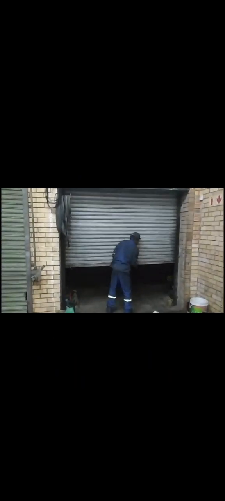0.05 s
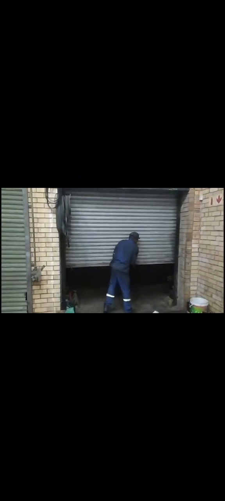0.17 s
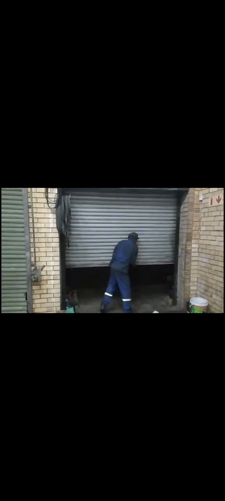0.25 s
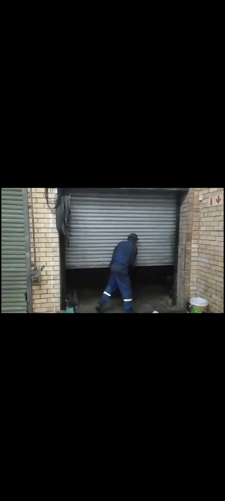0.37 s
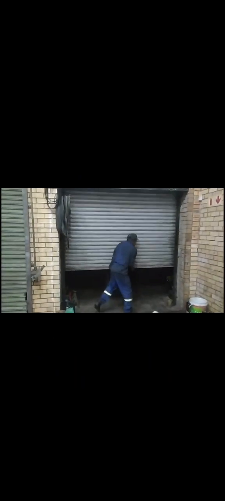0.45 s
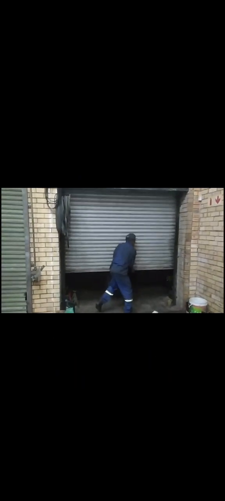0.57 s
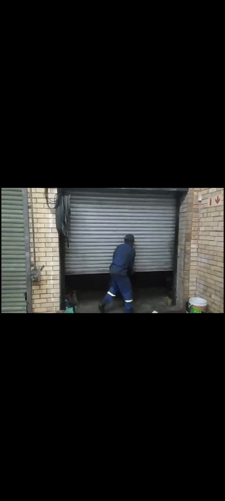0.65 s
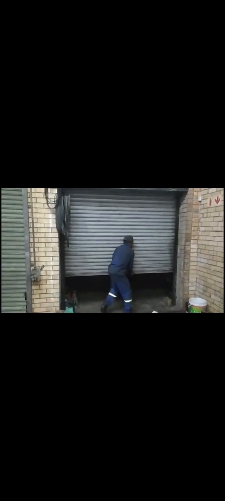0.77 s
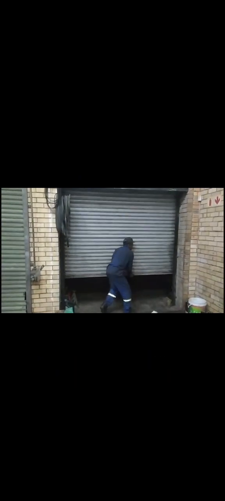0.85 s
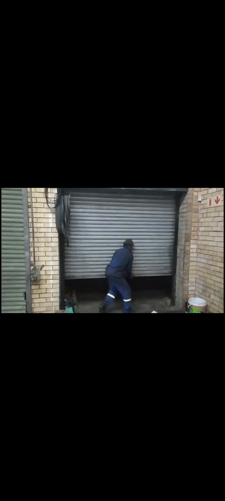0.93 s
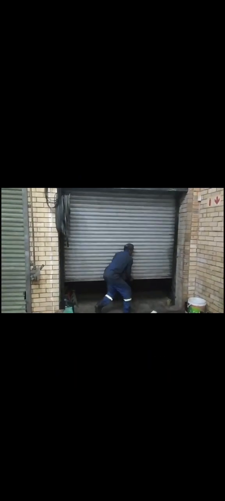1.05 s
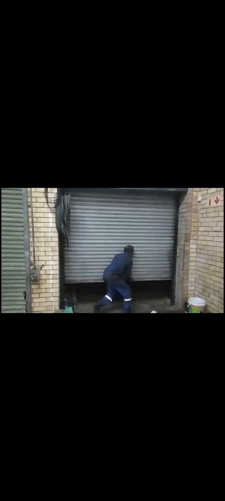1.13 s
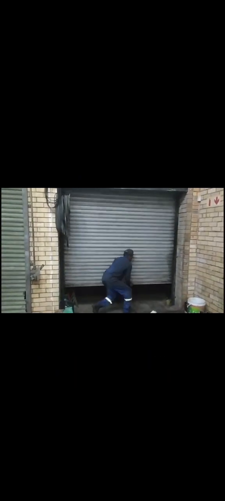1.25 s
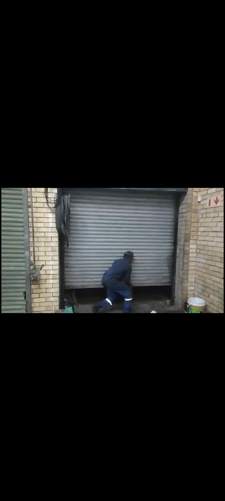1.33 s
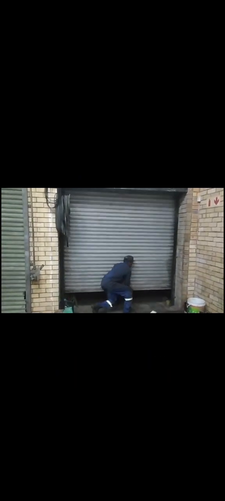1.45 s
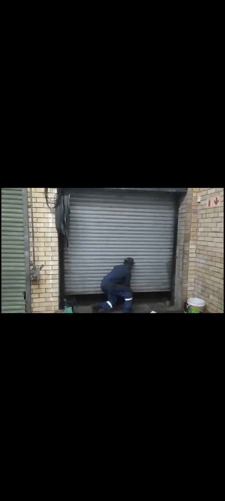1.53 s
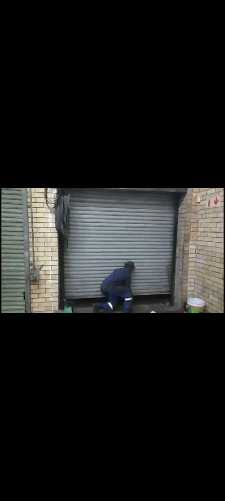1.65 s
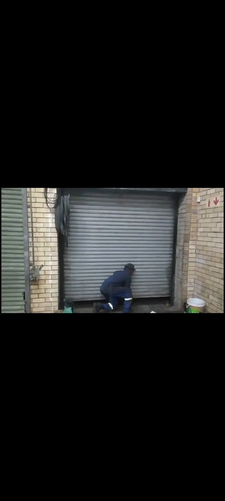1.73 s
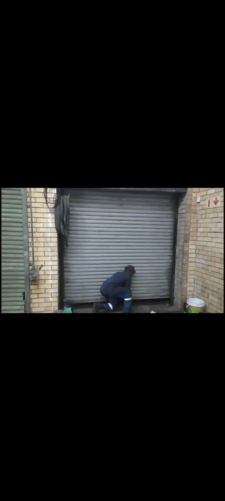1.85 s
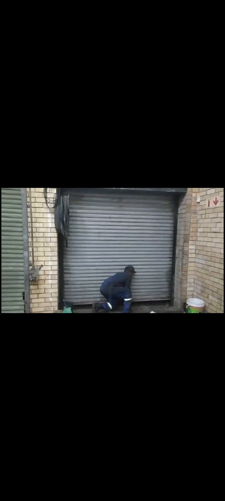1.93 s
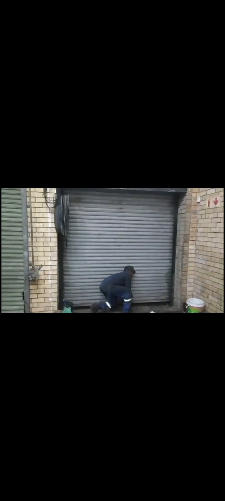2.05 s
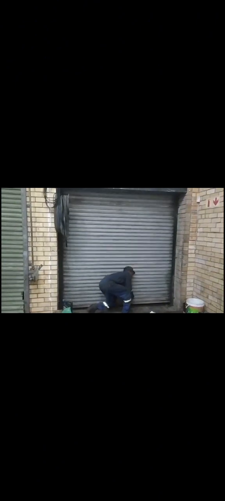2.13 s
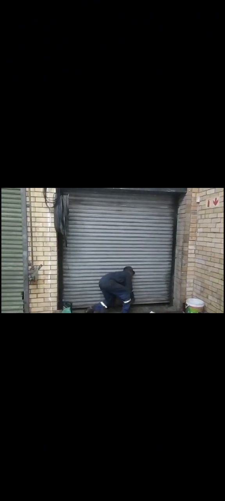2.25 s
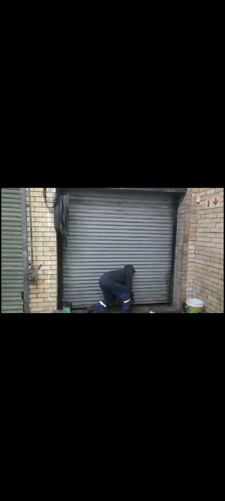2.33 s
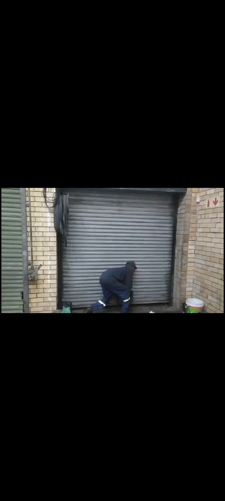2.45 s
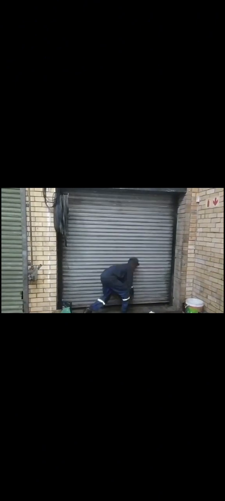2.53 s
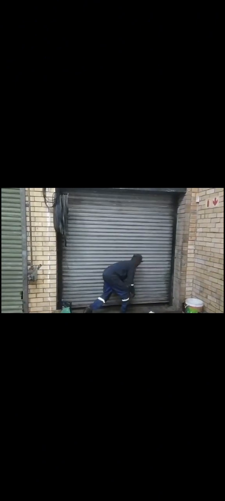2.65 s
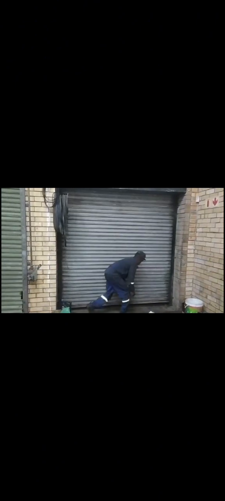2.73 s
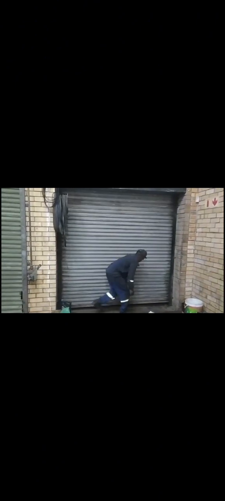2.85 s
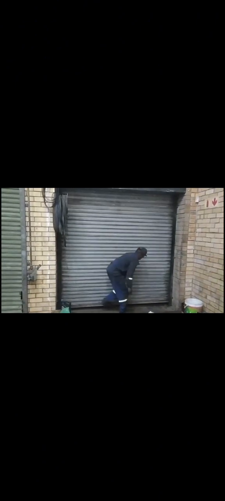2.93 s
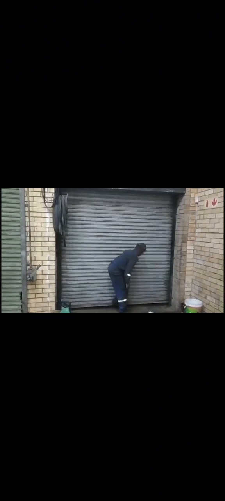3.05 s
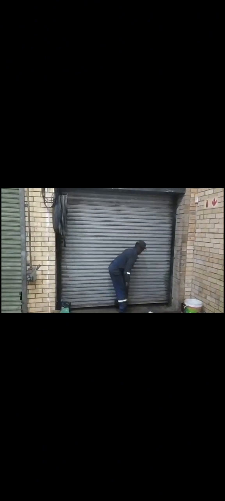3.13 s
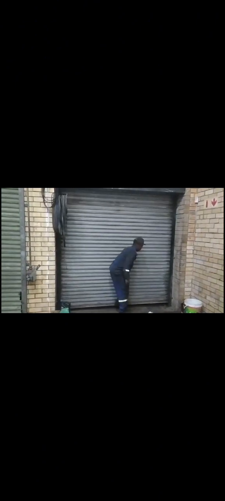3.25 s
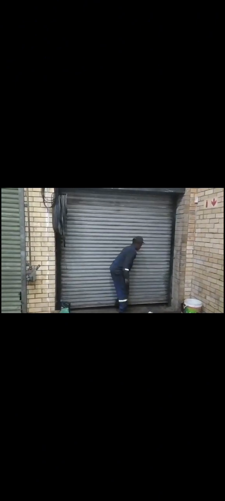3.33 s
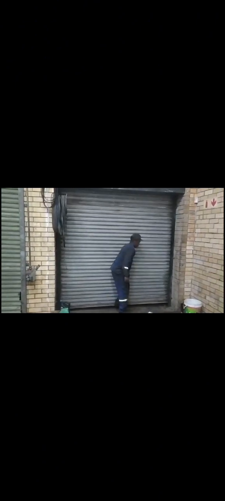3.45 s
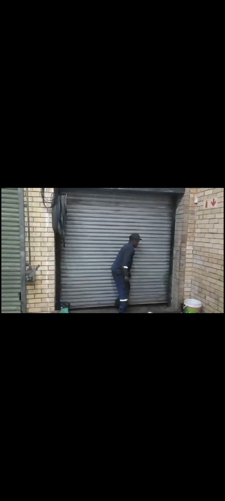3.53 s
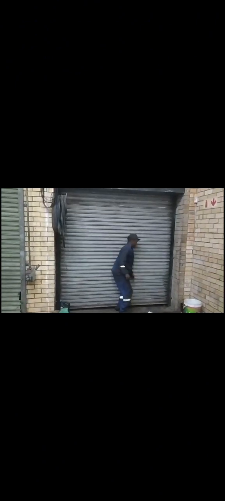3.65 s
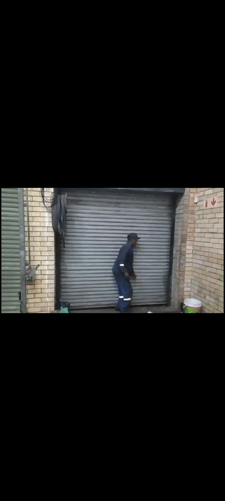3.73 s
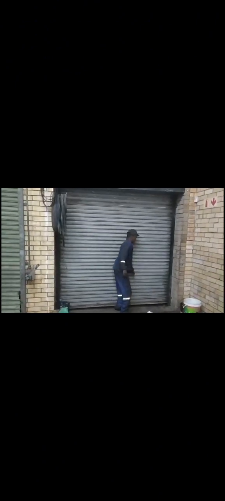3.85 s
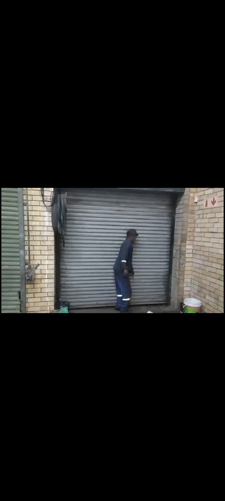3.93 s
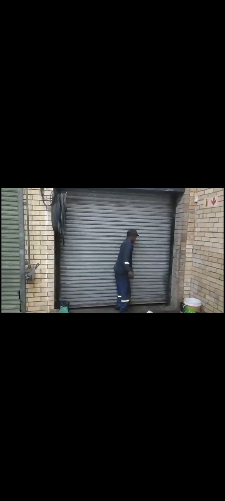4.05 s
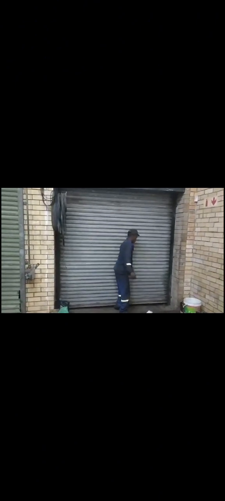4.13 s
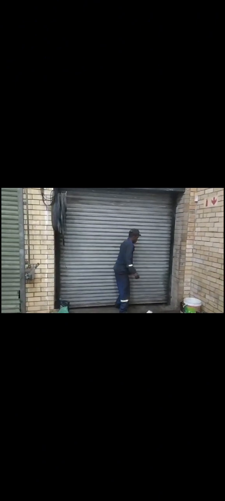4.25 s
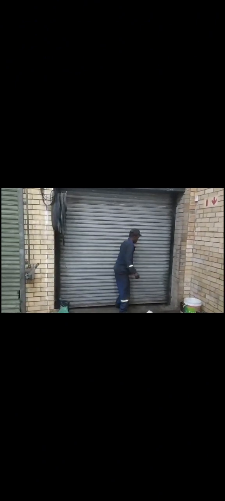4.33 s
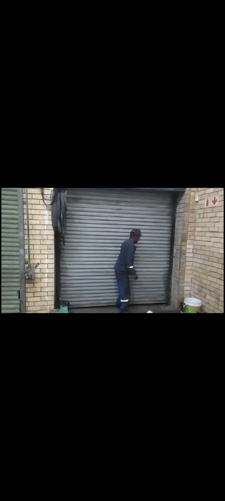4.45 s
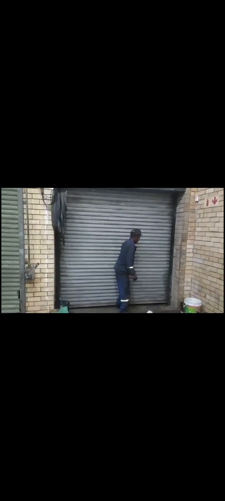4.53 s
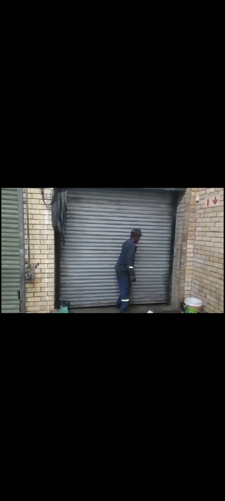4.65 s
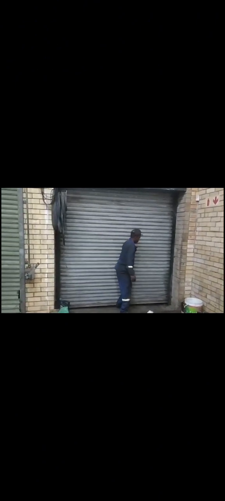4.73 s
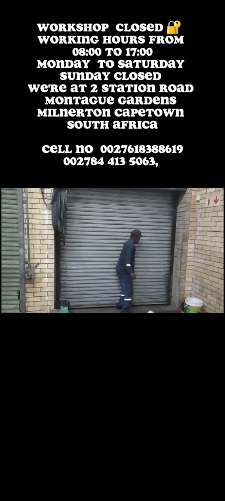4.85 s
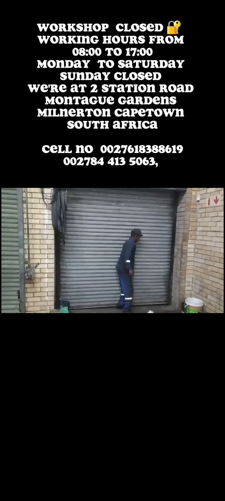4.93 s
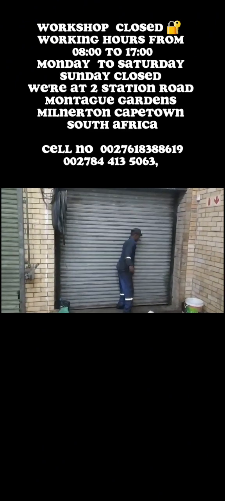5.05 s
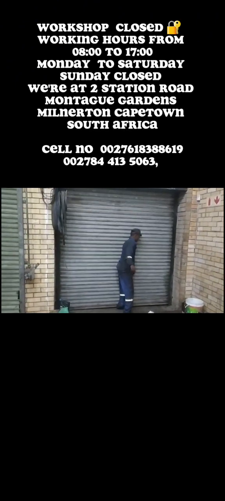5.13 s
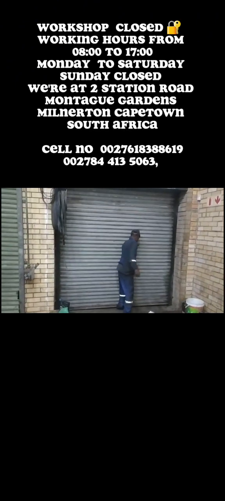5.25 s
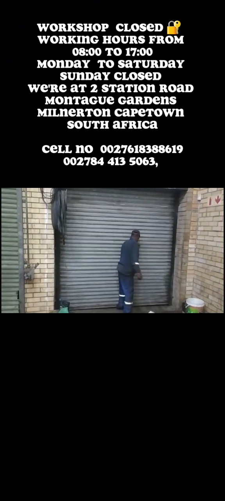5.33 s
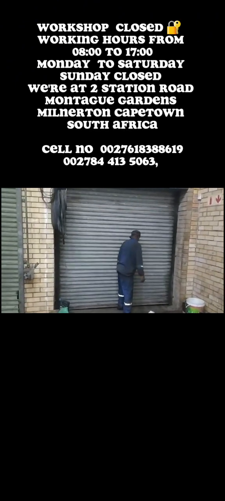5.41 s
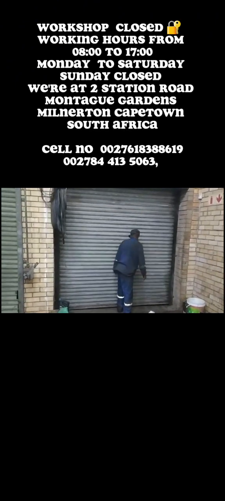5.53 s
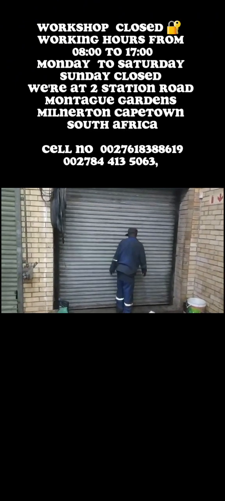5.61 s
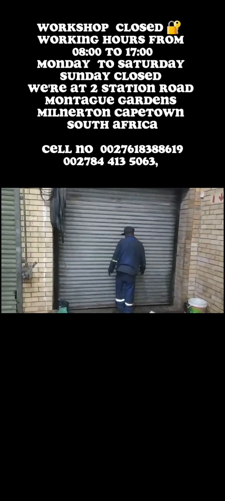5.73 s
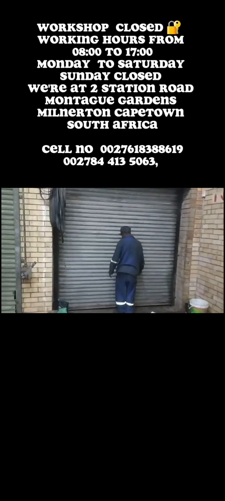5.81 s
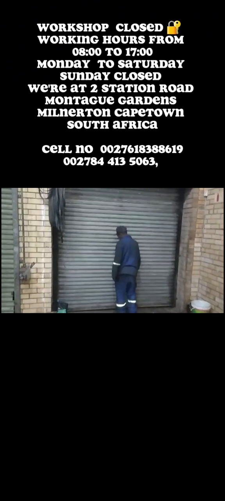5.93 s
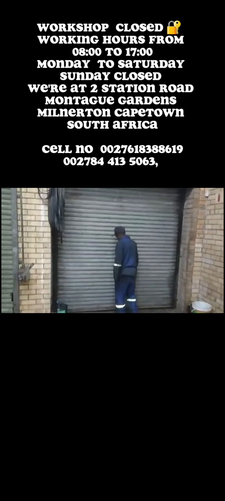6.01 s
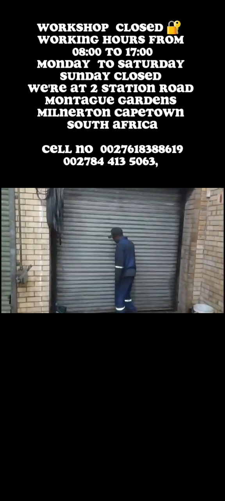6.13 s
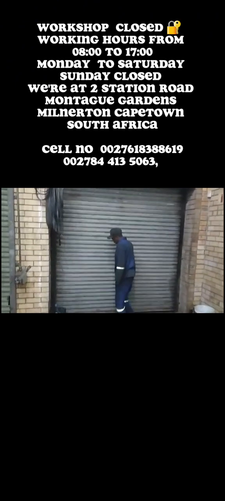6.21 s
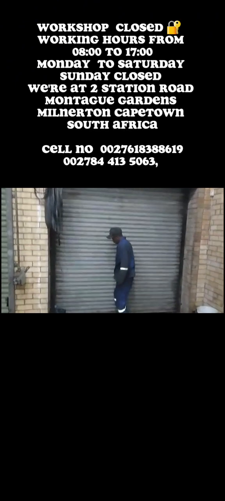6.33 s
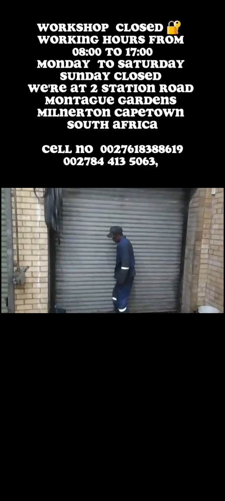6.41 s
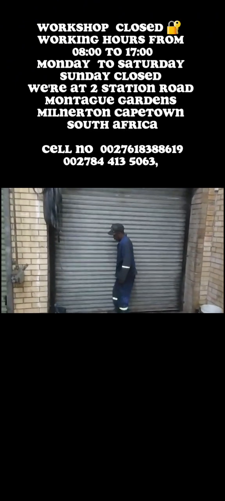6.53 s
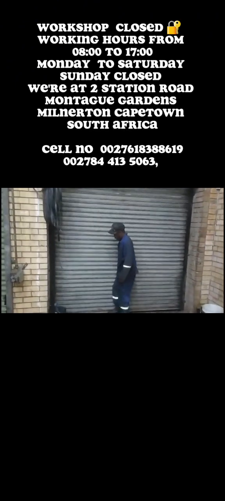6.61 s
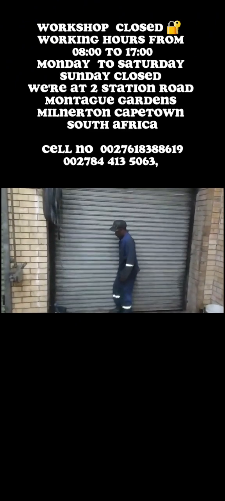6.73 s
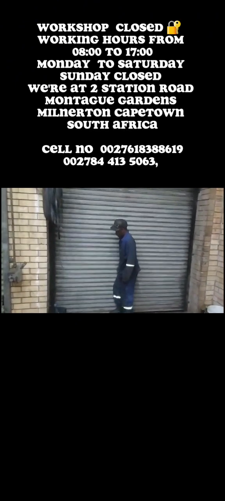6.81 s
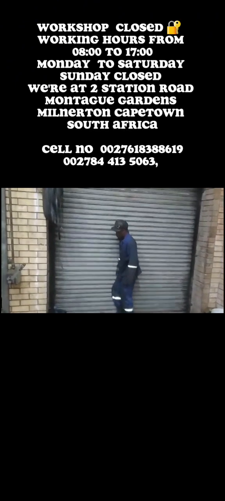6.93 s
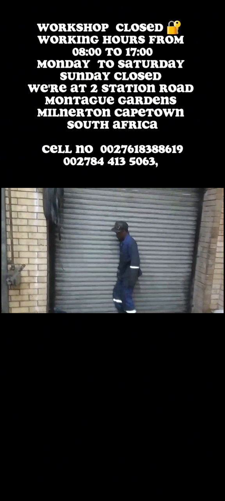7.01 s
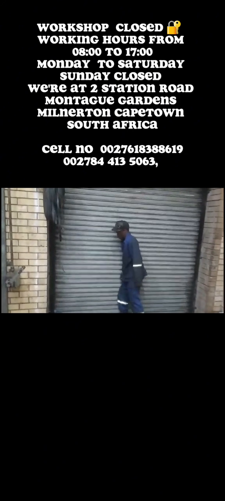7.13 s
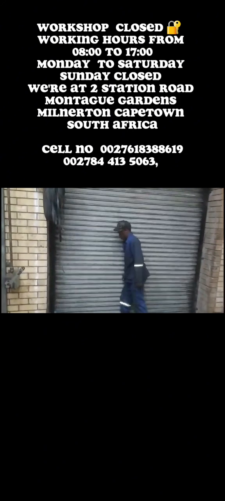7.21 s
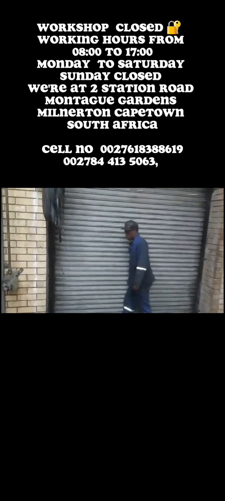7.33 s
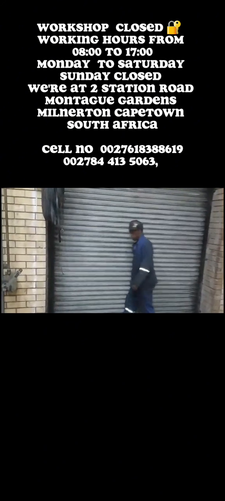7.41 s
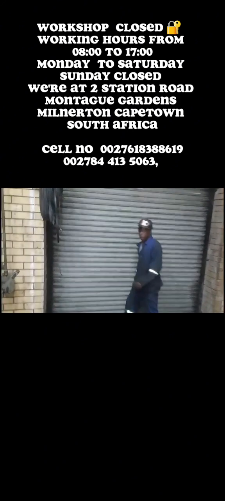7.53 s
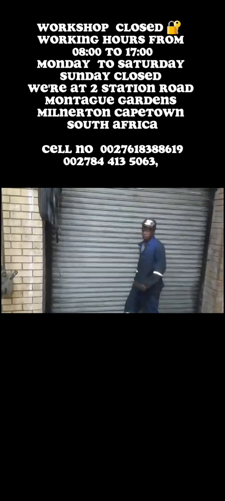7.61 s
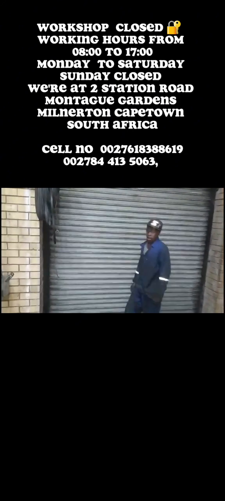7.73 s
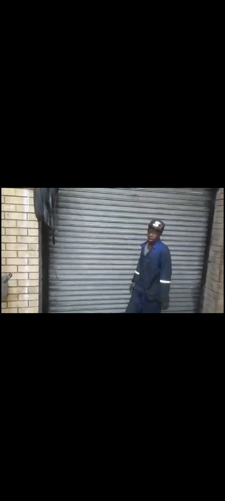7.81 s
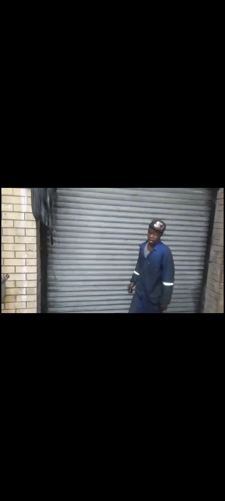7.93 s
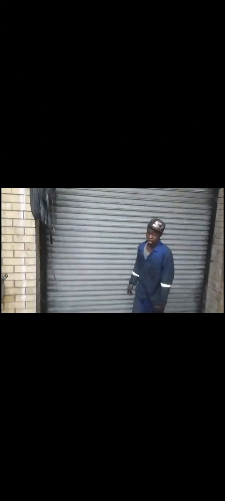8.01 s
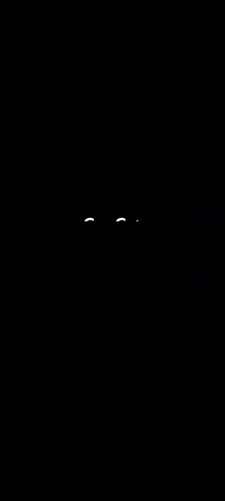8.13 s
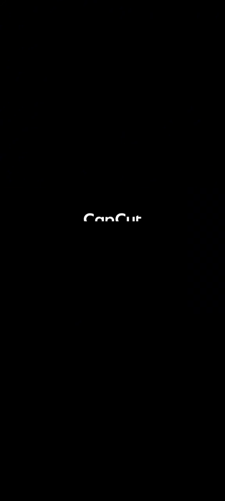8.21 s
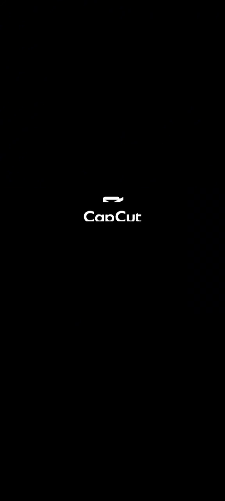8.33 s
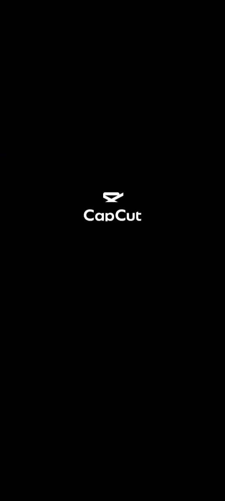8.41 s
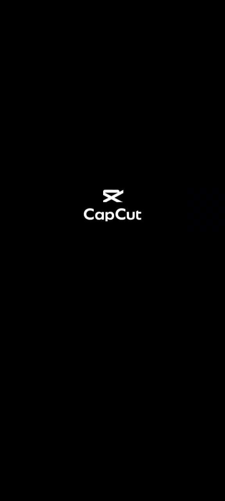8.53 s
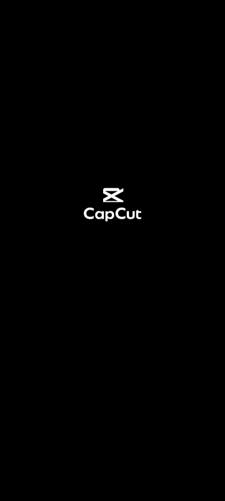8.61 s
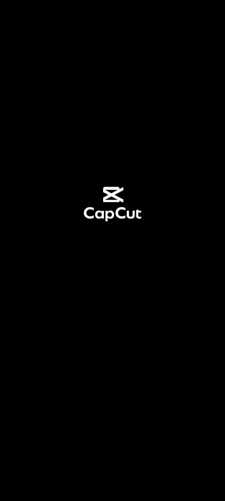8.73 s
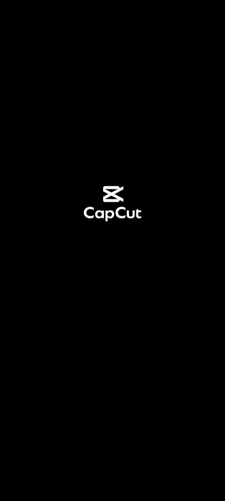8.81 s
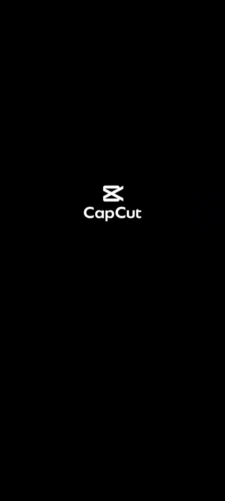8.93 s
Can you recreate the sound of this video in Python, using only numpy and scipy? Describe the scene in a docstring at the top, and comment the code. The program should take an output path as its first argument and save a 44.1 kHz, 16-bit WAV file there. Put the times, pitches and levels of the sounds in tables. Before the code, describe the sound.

A large metal shutter opens with a sharp knock and short rattle, then descends for nearly two seconds in dense, pulsing slat clatter with bright scraping. After landing, the steel rings away into near quiet. Spaced bangs follow, each with shuddering chatter, bright clashes and some squealing. Soft soles drag on sandy concrete and a stone snaps. Nearby stereo microphone in a hard-walled outdoor doorway; sudden silence finishes it.

```python
"""In a brick doorway on a quiet yard, a steel roller shutter is hauled down, bangs three more times and rings out.
Slats knock and shake the whole curtain, made by sending random taps and blows through a long noisy steel ring.
Their ends clash, scrape and squeal in the side guides; the coil rumbles and its bearing groans.
Grit clicks and soles scuff, made from filtered noise and grains. The sound stops dead at the end."""
import sys
import numpy as np
from scipy import signal
from scipy.fft import rfft, irfft, next_fast_len
from scipy.io import wavfile

SR = 44100
rng = np.random.default_rng(int(sys.argv[2]) if len(sys.argv) > 2 else 0)


def persist_wave(psi):
    """Save psi, clipped to +-1, as 16-bit WAV."""
    counts = np.round(np.clip(psi, -1, 1) * 32767).astype(np.int16)
    wavfile.write(sys.argv[1], SR, np.atleast_2d(counts).T)


N = 395131
T = np.arange(N) / SR  # time in seconds
RING_SIZE = 2 * SR  # the steel responses last two seconds

# All levels are gains that set the balance inside a layer; they are not final loudness.
# Blows to the curtain. Each row: start in seconds, level in dB, low thud in dB, boom of the coil in dB,
# chatter that follows in dB, time to swing back in seconds, length of the contact in seconds.
BLOWS = [(.001, -14.5, -30, -33, -20, 0.066, 0.0042), (.105, -29, -29, -38, -30.5, .03, .015),
         (.436, -28, -40, -50.5, -25.5, 0.075, 0.012), (.572, -27.5, -47.5, -48.5, -25, .07, 0.013),
         (.679, -27, -36.5, -39.5, -31, .06, 0.0094), (.893, -19.5, -35.5, -31, -36.5, .034, 0.017),
         (1.075, -27.5, -38.5, -34.5, -35, .03, 0.023), (1.389, -25, -27, -33.5, -34, .03, 0.019),
         (1.499, -21.5, -33.5, -26.5, -31, .06, 0.019), (1.716, -14.5, -22.5, -26.5, -35.5, .025, 0.023),
         (2.06, -20, -32, -37, -37, .03, 0.016), (2.484, -24, -33.5, -38.5, -28.5, 0.028, 0.017),
         (3.12, -36.5, -36.5, -45.5, -52.5, 0.033, 0.017), (3.211, -26, -31, -42, -44, .048, 0.008),
         (3.61, -37.5, -37, -57, -42, 0.09, 0.017), (3.785, -17.5, -28.5, -42, -16.5, 0.11, 0.03),
         (4.971, -22.5, -28.5, -45, -15.5, 0.11, 0.033), (6.535, -43.5, -37.5, -45.5, -54, 0.043, 0.05),
         (7.114, -20.5, -29, -32, -18, 0.09, 0.023)]
# The loudest clashes of slat ends on the guides. Each row: start in seconds, level in dB,
# length of the contact in seconds, dry click in dB, pitch of the slat end in Hz.
CLASHES = [(.192, -29, .014, -36, 8350), (0.56, -26, 0.0094, -24, 8900), (0.735, -15, 0.011, -18, 5850),
           (.884, -10.5, 0.011, -21, 6700), (1.083, -13.5, 0.013, -21.5, 9000),
           (1.211, -22, 0.012, -32, 8550), (1.39, -16, 0.013, -24, 7600), (1.701, -21.5, 0.0072, -25, 9200),
           (2.054, -14.5, 0.0056, -20, 7650), (2.107, -18, 0.017, -29, 8550),
           (2.222, -15, 0.019, -30, 8400), (3.21, -26, 0.0086, -40, 9250), (3.785, -12, 0.021, -24.5, 8400),
           (3.811, -13.5, 0.014, -25, 8900), (3.893, -21, 0.019, -16.5, 5200),
           (4.236, -32, 0.02, -34, 9150), (4.971, -18, 0.0028, -20, 8400), (4.98, -16.5, 0.016, -15, 8600),
           (5.11, -23, .02, -31, 5600), (5.175, -18.5, 0.014, -27, 5800), (6.704, -38.5, .0025, -36, 9800),
           (7.114, -18.5, 0.016, -35, 8700), (7.129, -12.5, 0.012, -18.5, 8600),
           (7.213, -21.5, 0.006, -18.5, 8950), (7.23, -25, 0.011, -20.5, 8000),
           (7.306, -25, 0.011, -27, 8800), (7.458, -22, 0.011, -30, 6600)]
# Steel sticking and slipping in the guides. Each row: start in seconds, length in seconds, pitch in Hz,
# level in dB, share of the length spent swelling, pitch unsteadiness as a share.
SQUEALS = [(0.188, 0.023, 5160, -25, 0.25, 0.085), (0.57, 0.04, 5370, -30.5, .4, 0.11),
           (1.459, 0.29, 5310, -20, 0.32, 0.12), (3.801, 0.37, 5000, -21.5, 0.074, 0.094),
           (5.074, 0.2, 5270, -31, 0.18, 0.16), (7.125, .12, 5430, -23, .1, 0.076),
           (7.221, 0.033, 5595, -18.5, 0.32, 0.073), (7.235, 0.31, 5580, -20, 0.064, .08)]
# Short slides of the curtain in its guides. Each row: start in seconds, length in seconds,
# slat rattle in dB, scrape in dB.
SLIDES = [(0, 0.12, -20, -18.5), (3.055, 0.28, -38.5, -38), (3.721, 0.053, -32, -31.5),
          (4.927, 0.039, -35.5, -31), (5.52, 0.11, -54, -39.5), (5.726, 0.033, -34.5, -33.5),
          (5.92, 0.06, -58.5, -37), (6.516, 0.11, -41.5, -38), (6.76, 0.14, -44.5, -39.5),
          (7.052, 0.55, -32.5, -35), (7.438, 0.17, -71, -33)]
# Places where slat ends rub in the guides. Each row: pitch in Hz, level in dB,
# extra power of the scrape (no unit): the higher, the harder the rub it needs.
RUBS = [(4740, 5, 0.3), (5560, 0.5, 0.82), (7260, -6.5, 0.31), (8330, -5, 0.0058), (9100, -3.5, 0),
        (10200, -6, 0.017)]
# Groans of the drum's bearing. Each row: start in seconds, length in seconds, pitch in Hz, level in dB.
CREAKS = [(.455, .035, 373, -27.5), (0.497, .04, 407, -24), (0.551, .045, 808, -23)]
# Grit under a shoe. Each row: start in seconds, level in dB, pitch in Hz, sharpness Q (no unit),
# length in seconds.
GRIT = [(3.036, -37, 4970, 1.7, 0.009), (6.2102, -16.5, 5600, 4.5, 0.00099), (6.325, -38, 9200, 1.5, .001),
        (6.333, -29, 4200, 1.3, 0.0016), (6.346, -25, 3800, 1.2, 0.0036), (6.427, -27, 3370, 1.4, 0.0027)]
# Soles dragging on the floor. Each row: start in seconds, length in seconds, level in dB.
SCUFFS = [(5.734, 0.38, -39), (6.11, 0.099, -51), (6.32, .09, -46.5), (6.517, 0.45, -40.5)]
# The curtain's strongest modes. Each row: pitch in Hz, level in dB, time to fall 60 dB in seconds.
MODES = [(144.5, -8, 3.2), (259.5, -1, 2.0), (292, -2, 2.9), (367, -4, 2.2), (438, -4, 1.9), (576, -5, 1.7),
         (686, 0, 1.7), (797, 0, 2.0), (2350, -6, 0.89)]
# Ring time of the steel. Each row: frequency in Hz, time to fall 60 dB in seconds.
RING_TIMES = [(60, 2.9), (250, 1.86), (800, 1.83), (2300, 1.56), (5000, 1.25), (12000, 1.13)]
# Colour of the knocking slats. Each row: frequency in Hz, level in dB.
SLAT_COLOUR = [(25, -25), (115, -18), (155, -10), (250, -3), (360, 0.5), (510, -1.5), (740, 2.5),
               (1150, -1), (1650, -2.5), (2500, 1), (2900, -1.5), (3300, -8), (4200, -14.5), (8500, -6.5),
               (12000, -24), (15000, -50)]
# Colour of the side guides. Each row: frequency in Hz, level in dB.
GUIDE_COLOUR = [(50, -14.5), (200, -17.5), (2500, -9), (4100, -8), (4650, -11), (5350, -5), (6300, -7),
                (7700, -1), (9200, 2), (10100, -4), (11000, -11), (12400, -21.5), (13700, -23),
                (15500, -51)]
# Colour of the curtain's low thud. Each row: frequency in Hz, level in dB.
THUD_COLOUR = [(25, -11.5), (115, -11.5), (150, -6), (250, 1.5), (350, 5), (470, -6), (750, -0.5),
               (2000, -21), (6000, -70.5)]
# Colour of the hollow coil. Each row: frequency in Hz, level in dB.
DRUM_COLOUR = [(25, -46), (122, -37.5), (152, -5), (180, 2), (220, 6), (290, -2.5), (500, -23.5),
               (2000, -48.5)]
# Colour of a bare steel contact. Each row: frequency in Hz, level in dB.
CONTACT_COLOUR = [(500, -13.5), (3000, -10.5), (5500, -3.5), (7200, 4), (9000, 10.5), (11000, 1),
                  (13500, -9), (16000, -36)]
# Colour of sand under a sole. Each row: frequency in Hz, level in dB.
SAND_COLOUR = [(500, -24), (4000, -14), (6300, -12), (7800, -3), (9200, 0), (10700, -3), (12300, -14),
               (14000, -18), (15500, -32)]
# Colour of the yard. Each row: frequency in Hz, level in dB.
YARD_COLOUR = [(25, -3), (60, -8), (120, -5), (190, -2), (400, -6.5), (1000, -12.5), (2400, -16),
               (4200, -28.5), (9000, -25), (13000, -36.5)]
# Stereo balance. Each row: frequency in Hz, left minus right in dB.
BALANCE = [(700, 0), (1300, 0), (2400, 7), (3300, 4), (4400, 0), (8200, -4), (10500, 7), (13000, 9.5)]

PORT_LAG_S = .00015  # the right port hears a little later
SIDES = np.array([[1], [-1]])  # left, right

# The long haul down: the curtain gathers speed, then eases off until it lands.
HAUL_START_S, HAUL_FASTEST_S, HAUL_END_S = 0.54, 1.76, 2.306
GATHER_DB_PER_S, EASE_DB_PER_S = 3.5, 1.5
RATTLE_DB, SCRAPE_DB, RUMBLE_DB = -15, -17, -30  # at full speed, before the lurches
# Slat after slat tips off the drum, and the curtain lurches each time.
SLAT_PERIOD_S, LURCH_AT_S = 0.1649, 1.55
LURCH_RATTLE_DB, LURCH_SCRAPE_DB, LURCH_RUMBLE_DB = 2.5, 0, 4
RUMBLE_POWER = 1.6  # the drum's rumble grows as this power of the speed
UNWOUND_DB_PER_S = 19  # and dies as the coil runs out
START_S, STOP_T60_S = 0.04, 0.62  # every movement starts and stops alike
SURGE_DB = 1.4  # slats bind and come free, so the rattle swells unevenly

# Swinging back, the slat ends hit the guides again; _DB values here are relative to the chatter.
REBOUND_DB, REBOUND_CONTACT_S = -6.5, 0.021
SWAY_SCRAPE_DB, SWAY_BOOM_DB, SWAY_THUD_DB = -6.5, -21.5, -15.5
CRACK_DB = -9  # the dry crack of a blow, relative to the ring that follows
SLAT_END_Q, SLAT_END_DB = 6.5, 5  # each slat end rings broadly around its own pitch
SQUEAL_CATCH_DB = 3.5  # the grip catches and slips many times within a squeal
# Pitch wobble as a share; overtone in dB; ring left in the curtain in dB.
CREAK_UNSTEADY, CREAK_OCTAVE_DB, CREAK_RING_DB = 0.061, -15.5, -17
GRIT_SNAP_DB, GRIT_ECHO_DB = -9.5, -24  # broad snap of each stone; its echo in the doorway
GRIT_SPLINTER_HZ, GRIT_SPLINTER_DB = 8400, -7  # the bright edge of each crack
END_S, TOP_HZ = 8.062, 15700  # when the sound stops; top of the treble


def amp(db):
    """Turn decibels into gain."""
    return 10 ** (np.asarray(db) / 20)


def unit(x):
    """Scale to an rms of 1."""
    return x / np.sqrt(np.mean(x ** 2))


def along(points, f):
    """Read (Hz, value) points on a log-frequency axis."""
    hz, value = np.transpose(points)
    return np.interp(np.log(f + 1), np.log(hz), value)


def fade(t, t60):
    """Free decay that falls 60 dB in t60 seconds."""
    return np.exp(-np.log(1000) * t / t60)


def wander(size, step):
    """Smooth chance: a new random value every step samples, with straight lines between."""
    return np.interp(np.arange(size) / step, np.arange(size), rng.standard_normal(size))


def resonate(x, hz, sharpness):
    """One broad resonance with gain 1 at its centre."""
    b, a = signal.iirpeak(hz, sharpness, fs=SR)
    return signal.lfilter(b, a, x + 1e-18)  # the tiny offset avoids slow near-zero numbers


def diffuse(colour, size):
    """Spectrum of sound from all around at two close ports: alike in the bass, unrelated in the treble."""
    f = np.fft.rfftfreq(size, 1 / SR)
    mid, side = rfft(rng.standard_normal((2, size)))
    alike = 1.026 / (1 + (f / 760) ** 3)
    shared = mid * np.sqrt(1 + alike)
    different = side * np.sqrt(np.clip(1 - alike, 0, 1))
    pair = shared + SIDES * different
    pair[1] *= np.exp(-2j * np.pi * f * PORT_LAG_S)
    return f, pair * amp(along(colour, f) + SIDES * along(BALANCE, f) / 2)


def steel(colour, early_db, early_t60, patchy_db):
    """Ring from one place: countless uneven modes, loud near the contact, then spreading and ringing on."""
    f, field = diffuse(colour, RING_SIZE)
    field = field * amp(patchy_db * wander(len(f), 128))
    t = T[:RING_SIZE]
    hz, t60 = np.transpose(RING_TIMES)
    tail = 0
    for band, life in zip(np.eye(len(hz)), t60):
        weight = along(np.c_[hz, band], f)  # overlapping bands, each with its own decay
        tail = tail + irfft(field * weight) * fade(t, life)
    early = 1 + amp(early_db) * fade(t, early_t60)
    return unit(tail * early) / np.sqrt(RING_SIZE)


def click(colour, size=512):
    """The short crack that comes straight from a contact, before the steel rings; the left port leads."""
    f = np.fft.rfftfreq(size, 1 / SR)
    delay = np.array([[0], [PORT_LAG_S]]) + .001
    gain = amp(along(colour, f) + SIDES * along(BALANCE, f) / 2)
    return unit(irfft(gain * np.exp(-2j * np.pi * f * delay))) / np.sqrt(size)


def excite(force, response):
    """Sound of a force acting on a response: every bit of force sets off a copy of the ring."""
    return signal.fftconvolve(force[None], response, axes=1)[:, :N]


def contacts(rate, spread_db):
    """Random taps of uneven size, about rate per second, scaled to rms 1."""
    taps = (rng.random(N) < rate / SR) * rng.choice([-1, 1], N)
    return unit(taps * amp(spread_db * rng.standard_normal(N)))


def knock(start, db, length):
    """One blow: a noisy flurry that builds and fades, as strong as 0.1 s of rattle at that level."""
    size = SR // 5
    age = T[:size] / length
    flurry = rng.standard_normal(size) * (1 - np.exp(-age / 0.16)) * np.exp(-age ** 2)
    force = np.zeros(N + size)
    first = int(start * SR)
    force[first:first + size] = amp(db) * unit(flurry) / np.sqrt(2)
    return force[:N]


def moving(start, end):
    """One movement of the curtain: it gets going, runs, and comes to rest."""
    return np.clip((T - start) / START_S, 0, 1) * fade(np.maximum(T - end, 0), STOP_T60_S)


def haul():
    """Speed of the curtain on its way down, 1 at its fastest."""
    early = np.maximum(HAUL_FASTEST_S - T, 0)
    late = np.maximum(T - HAUL_FASTEST_S, 0)
    return moving(HAUL_START_S, HAUL_END_S) * amp(-GATHER_DB_PER_S * early - EASE_DB_PER_S * late)


def lurch(depth_db):
    """A surge for each slat that leaves the drum."""
    return amp(depth_db * np.cos(2 * np.pi * (T - LURCH_AT_S) / SLAT_PERIOD_S))


def sway():
    """Strength of the chatter after the blows: it peaks as the curtain swings back."""
    power = 0
    for start, *_, chatter_db, swing_s, _ in BLOWS:
        age = np.maximum(T - start, 0) / swing_s
        swing = age ** 2 * np.exp(2 * (1 - age))  # 1 when age is 1
        power = power + (amp(chatter_db) * swing) ** 2
    return np.sqrt(power)


def motion():
    """Strength of slat rattle and of guide scrape, from the haul, the short slides and the swaying."""
    speed, chatter = haul(), sway()
    surge = unit(amp(SURGE_DB * wander(N, SR / 36)))
    rattle = amp(RATTLE_DB) * speed * surge * lurch(LURCH_RATTLE_DB)
    scrape = amp(SCRAPE_DB) * speed * lurch(LURCH_SCRAPE_DB)
    for start, length, rattle_db, scrape_db in SLIDES:
        slide = moving(start, start + length)
        rattle = rattle + amp(rattle_db) * slide
        scrape = scrape + amp(scrape_db) * slide
    return np.hypot(rattle, chatter), np.hypot(scrape, amp(SWAY_SCRAPE_DB) * chatter)


def yard():
    """Low, gently swelling outdoor background made of coloured noise."""
    _, field = diffuse(YARD_COLOUR, next_fast_len(N) * 2)
    noise = unit(irfft(field)[:, :N])
    return amp(-48.5) * noise * amp(1.2 * wander(N, SR / 5))


def modes():
    """The few modes that stand out of the curtain's ring, as fading sine tones."""
    t = T[:RING_SIZE]
    tones = 0
    for hz, db, t60 in MODES:
        tones = tones + amp(db) * np.sin(2 * np.pi * (hz * t + rng.random())) * fade(t, t60)
    return unit(tones) / np.sqrt(RING_SIZE)


def curtain(rattle, count=3):
    """Slats knock in their hinges at several places; each blow cracks, strikes and heaves the whole curtain."""
    struck = sum(knock(start, db, length) for start, db, *_, length in BLOWS)
    heave = sum(knock(start, thud_db, 0.019) for start, _, thud_db, *_ in BLOWS)
    heave = heave + amp(SWAY_THUD_DB) * sway() * contacts(rate=170, spread_db=-2.5)
    forces = [struck]
    for _ in range(count):
        forces.append(rattle / np.sqrt(count) * contacts(rate=85, spread_db=3.5))
    sheet = 0
    for force in forces:
        place = steel(SLAT_COLOUR, early_db=-0.5, early_t60=0.039, patchy_db=-0.5)
        sheet = sheet + excite(force, place)
    hum = amp(-19) * excite(sum(forces), modes()[None])
    crack = amp(CRACK_DB) * excite(struck, click(SLAT_COLOUR))
    thud = excite(heave, steel(THUD_COLOUR, early_db=1.5, early_t60=0.25, patchy_db=0.5))
    return sheet + hum + crack + thud


def drum():
    """The hollow coil above rumbles as it unwinds, and booms when a blow or the swaying curtain jolts it."""
    coil = amp(-UNWOUND_DB_PER_S * np.maximum(T - HAUL_FASTEST_S, 0))
    rolling = amp(RUMBLE_DB) * coil * haul() ** RUMBLE_POWER * lurch(LURCH_RUMBLE_DB)
    shaking = (rolling + amp(SWAY_BOOM_DB) * sway()) * contacts(rate=130, spread_db=-2.5)
    jolts = sum(knock(start, boom_db, 0.044) for start, _, _, boom_db, *_ in BLOWS)
    return excite(shaking + jolts, steel(DRUM_COLOUR, early_db=17.0, early_t60=.12, patchy_db=-4.5))


def scraping(scrape):
    """Slat ends rub in the guides; each place catches and lets go on its own, so the colour keeps shifting."""
    out = 0
    for hz, db, power in RUBS:
        grip = unit(amp(4.5 * wander(N, SR / 35)))
        pressure = (scrape / amp(SCRAPE_DB)) ** power
        taps = contacts(rate=110, spread_db=3.5)
        force = resonate(scrape * pressure * grip * taps, hz, sharpness=3.7)
        guide = steel(GUIDE_COLOUR, early_db=6.5, early_t60=0.077, patchy_db=4.0)
        out = out + amp(db) * excite(force, guide)
    return out


def slat_end(force, hz):
    """A contact coloured by the slat end that makes it."""
    ringing = force + amp(SLAT_END_DB) * resonate(force, hz, SLAT_END_Q)
    return ringing / (1 + amp(SLAT_END_DB) / 2)


def clashes():
    """Slat ends strike the steel channels, and again as the curtain swings back: bright and quick to fade."""
    rebounds = 0
    for start, *_, chatter_db, swing_s, _ in BLOWS:
        rebounds = rebounds + knock(start + swing_s, chatter_db + REBOUND_DB, REBOUND_CONTACT_S)
    struck = sum(slat_end(knock(start, db, length), hz) for start, db, length, _, hz in CLASHES)
    dry = sum(slat_end(knock(start, dry_db, length), hz) for start, _, length, dry_db, hz in CLASHES)
    guide = steel(GUIDE_COLOUR, early_db=10.5, early_t60=0.048, patchy_db=0.0)
    ring = excite(amp(-5.0) * (rebounds + struck), guide)
    return ring + amp(-7.0) * excite(dry, click(CONTACT_COLOUR))


def squeals():
    """Short, rough stick-slip shrieks of very unsteady pitch, with their octave, ringing in the guides."""
    force = np.zeros(N)
    unsteady = wander(N, 28)
    catching = unit(amp(SQUEAL_CATCH_DB * wander(N, SR / 300)))
    for start, length, hz, db, swell, spread in SQUEALS:
        on = (T >= start) & (T < start + length)
        phase = 2 * np.pi * np.cumsum(hz * (1 + spread * unsteady[on])) / SR
        grip = np.interp((T[on] - start) / length, [0, swell, 1], [0, 1, 0])
        tone = np.sin(phase) + amp(-5.5) * np.sin(2 * phase)
        force[on] += amp(db) * np.sqrt(0.51 / length) * grip * tone  # shorter squeals are stronger
    return excite(force * catching, steel(GUIDE_COLOUR, early_db=18.5, early_t60=0.059, patchy_db=1.5))


def creaks():
    """The drum's bearing takes the load and gives a few short, rough groans."""
    force = np.zeros(N)
    unsteady = wander(N, SR / 400)
    for start, length, hz, db in CREAKS:
        on = (T >= start) & (T < start + length)
        phase = 2 * np.pi * np.cumsum(hz * (1 + CREAK_UNSTEADY * unsteady[on])) / SR
        swell = np.sin(np.pi * (T[on] - start) / length)
        tone = np.sin(phase) + amp(CREAK_OCTAVE_DB) * np.sin(2 * phase)
        force[on] += amp(db) * swell * tone
    ring = excite(force, steel(SLAT_COLOUR, early_db=2, early_t60=.04, patchy_db=0.5))
    return force + amp(CREAK_RING_DB) * ring


def grit():
    """Stones snap under a shoe close by: a thin broad crack, the note of the stone and a bright splinter."""
    out = np.zeros((2, N))
    for start, db, hz, sharpness, length in GRIT:
        age = np.maximum(T - start, 0)
        shape = np.exp(-(age / length) ** 2) + amp(GRIT_ECHO_DB) * fade(age, 0.19)
        crack = rng.standard_normal((2, N)) * (T > start) * shape
        stone = resonate(resonate(crack, hz, sharpness), hz, sharpness)
        splinter = amp(GRIT_SPLINTER_DB) * resonate(crack, GRIT_SPLINTER_HZ, sharpness=4.7)
        out += amp(db) * (stone + splinter + amp(GRIT_SNAP_DB) * crack)
    return out


def scuffs():
    """Soles drag over the sandy concrete: a dry, bright spray of grains with a faint ring from the doorway."""
    weight = 0
    for start, length, db in SCUFFS:
        weight = weight + amp(db) * np.sin(np.pi * np.clip((T - start) / length, 0, 1))
    grains = weight * contacts(rate=1400, spread_db=5.5)
    return excite(grains, steel(SAND_COLOUR, early_db=24, early_t60=.02, patchy_db=0))


def scene():
    """Add up the yard, curtain, drum, guides and shoes."""
    rattle, scrape = motion()
    shutter = curtain(rattle) + drum() + scraping(scrape) + clashes() + squeals() + creaks()
    return yard() + shutter + grit() + scuffs()


def record(dry):
    """The loudest peaks clip, the sound stops dead and the top is cut."""
    running = np.clip((END_S - T) / .006 + 1, 0, 1)  # gone within 6 ms
    clipped = np.clip(dry, -.92, .92) * running
    low_pass = signal.ellip(8, .2, 70, TOP_HZ, fs=SR, output="sos")
    return signal.sosfilt(low_pass, clipped)


dry = scene()
out = record(dry)
persist_wave(out)
```